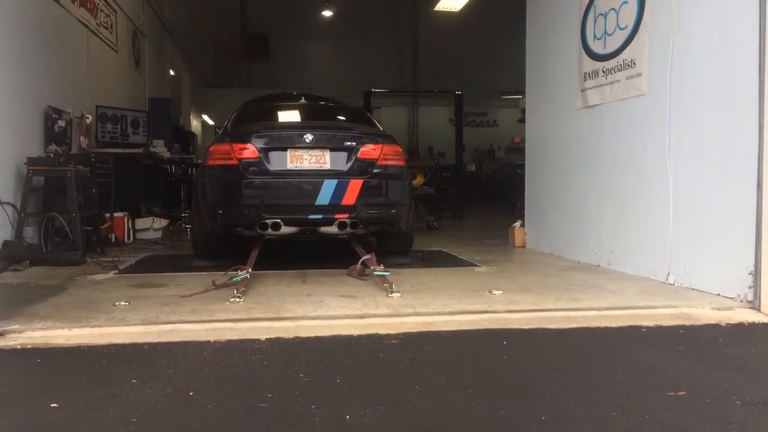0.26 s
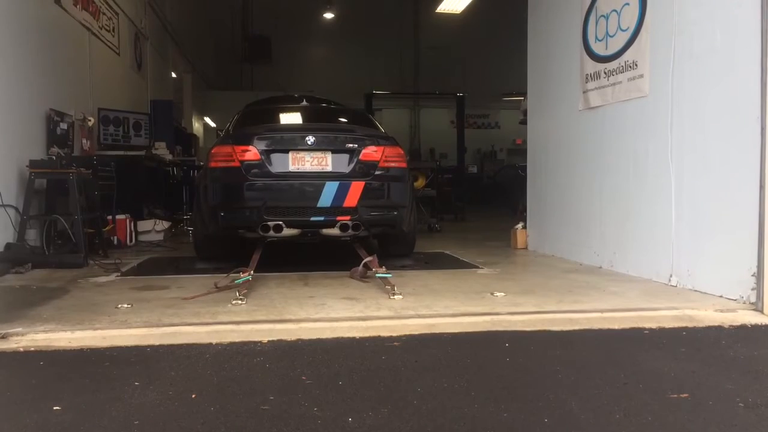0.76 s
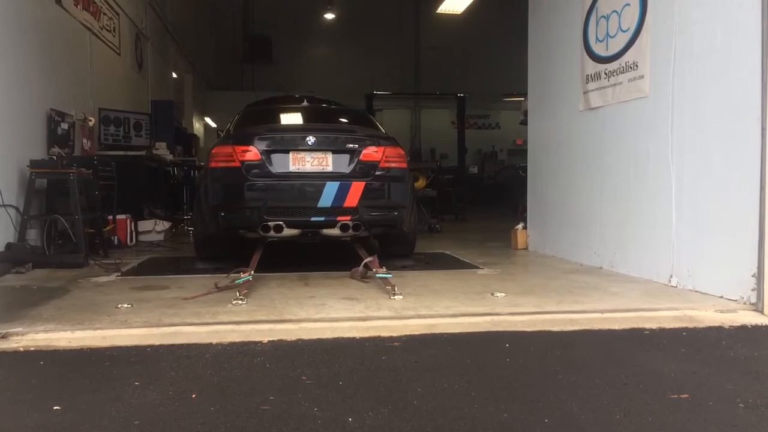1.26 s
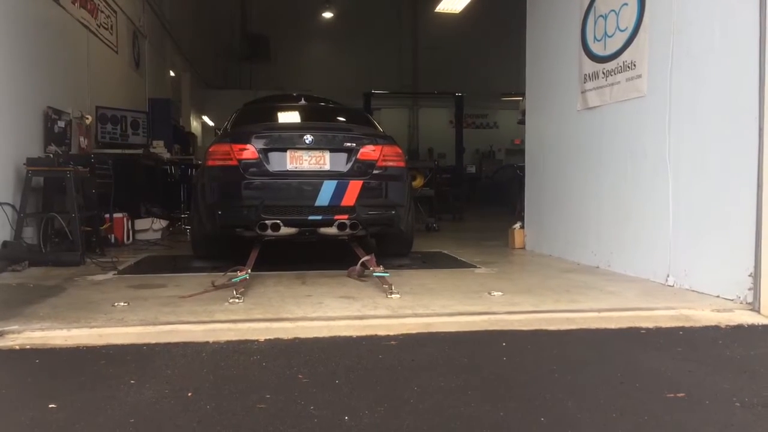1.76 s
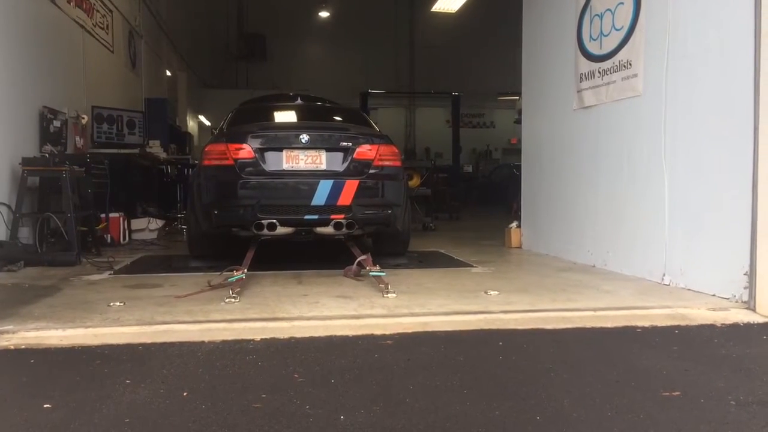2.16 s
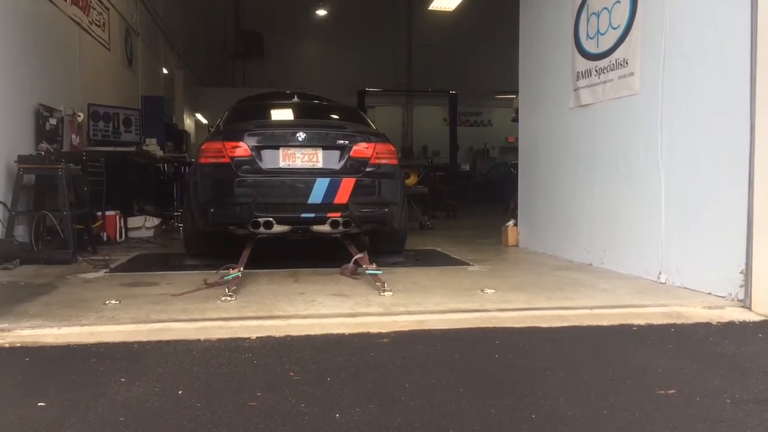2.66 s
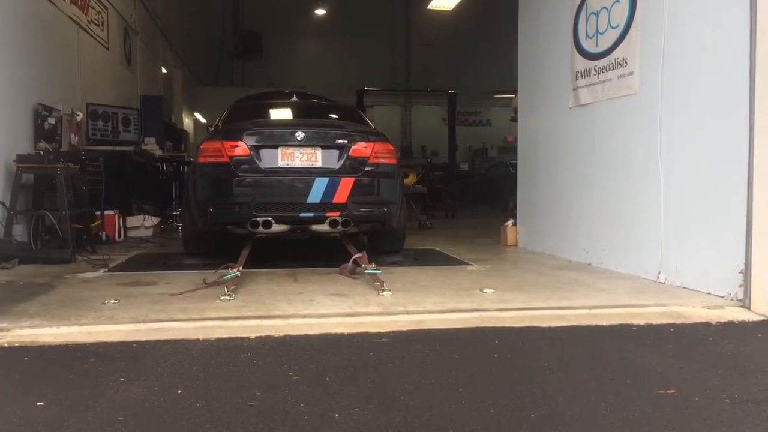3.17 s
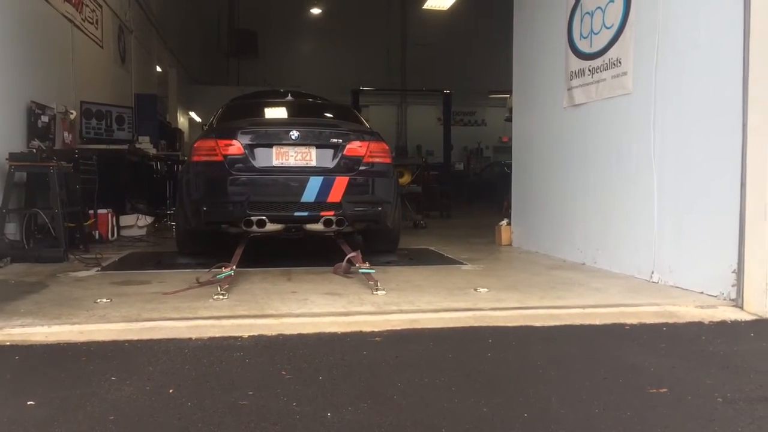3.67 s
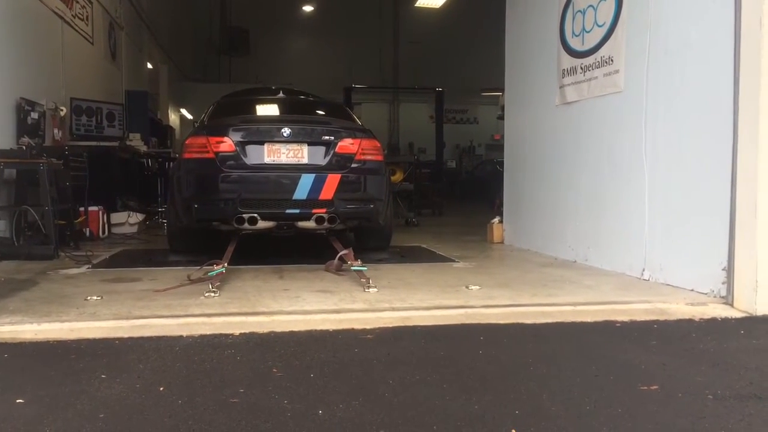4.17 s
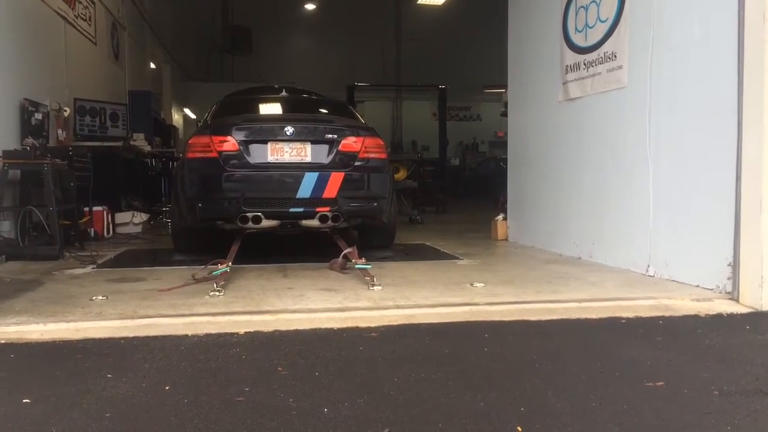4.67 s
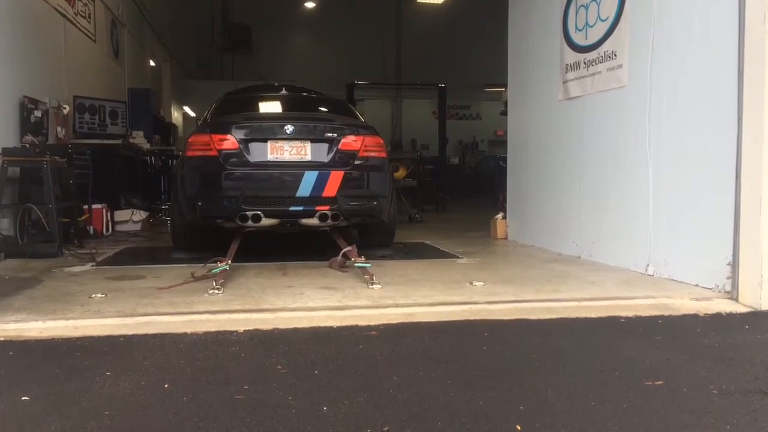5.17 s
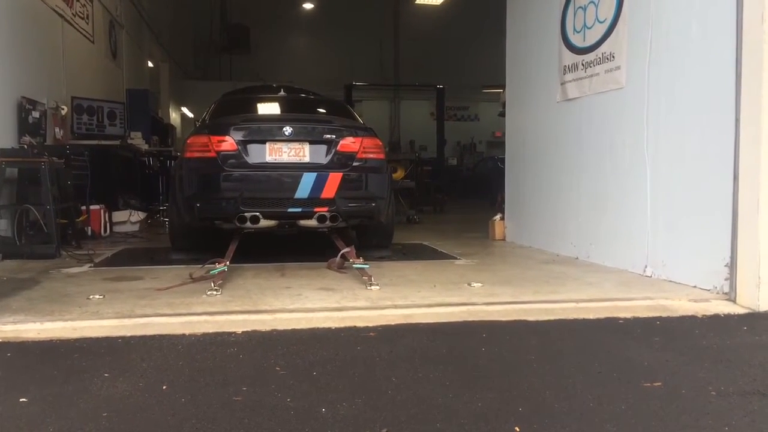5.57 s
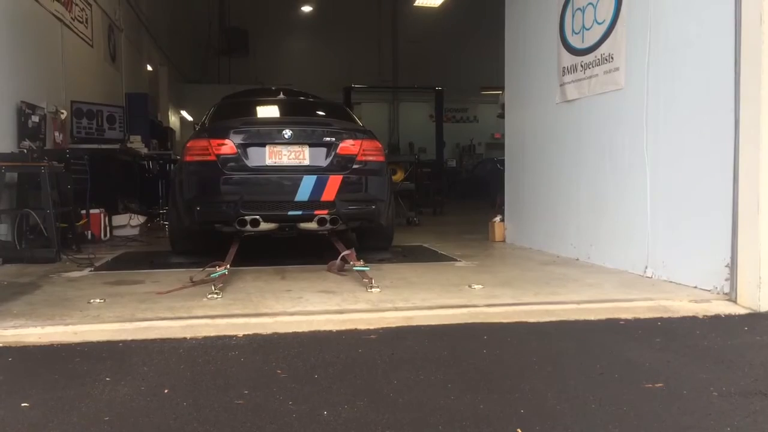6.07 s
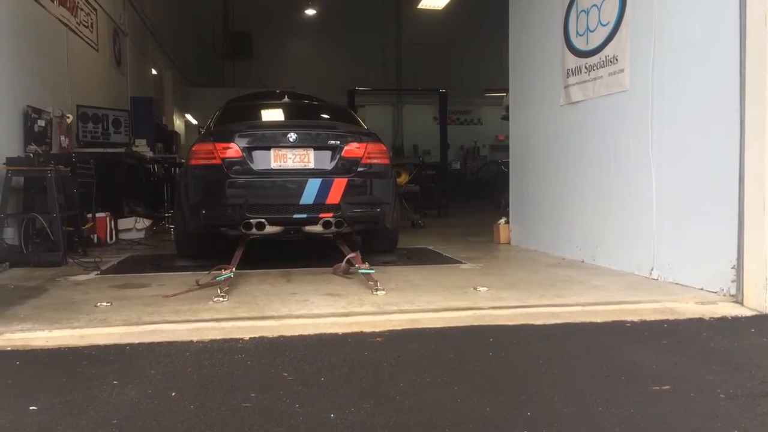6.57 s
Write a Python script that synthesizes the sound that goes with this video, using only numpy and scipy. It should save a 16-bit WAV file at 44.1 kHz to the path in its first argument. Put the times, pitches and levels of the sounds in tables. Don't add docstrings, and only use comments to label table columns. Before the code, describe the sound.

On a roller test bed, a sports car's low exhaust hum and high roller whine slide down together, then full throttle brings a raspy, rising roar.

```python
import sys
import numpy as np
from scipy import signal
from scipy.fft import rfft, irfft, next_fast_len
from scipy.io import wavfile
from scipy.ndimage import uniform_filter1d, minimum_filter1d, map_coordinates

SR = 44100
rng = np.random.default_rng(int(sys.argv[2]) if len(sys.argv) > 2 else 0)


def bounce(signal):
    frames = np.transpose(np.atleast_2d(signal))
    limited = np.clip(frames, -1, 1)
    pcm = np.round(limited * 32767).astype(np.int16)
    wavfile.write(sys.argv[1], SR, pcm)


def invert_db(level):
    return 10 ** (np.asarray(level, dtype=float) / 20)


N = 300762


def unit(x):
    return x / np.sqrt(np.mean(x ** 2) + 1e-20)


def along(points, hz):
    f, v = np.transpose(points)
    return np.interp(np.log(hz + 1), np.log(f + 1), v)


def curves(rows):
    s, *cols = np.transpose(rows)
    return [np.interp(np.arange(N) / SR, s, c) for c in cols]


def wobble(rate_hz):
    coarse = np.arange(0, N + 32, 32)
    knots = rng.standard_normal(int(N * rate_hz / SR) + 4)
    return np.interp(np.arange(N), coarse, map_coordinates(knots, [coarse * rate_hz / SR]))


def filtered(x, response):
    m = next_fast_len(N + SR // 2)
    return irfft(rfft(x, m) * response(np.fft.rfftfreq(m, 1 / SR)), m)[:N]


def causal(x, spectrum):
    size = 8192
    cepstrum = irfft(np.log(invert_db(along(spectrum, np.fft.rfftfreq(size, 1 / SR)))))
    cepstrum[1:size // 2] *= 2
    cepstrum[size // 2 + 1:] = 0
    return signal.fftconvolve(x, irfft(np.exp(rfft(cepstrum))))[:N]


def resonant(x, modes, low_hz):
    def response(f):
        peaks = sum(invert_db(db) * 1j * f * w / (c * c - f * f + 1j * f * w) for c, w, db in modes)
        return peaks * (1j * f / (low_hz + 1j * f)) ** 2
    return filtered(x, response)


def soften(f):
    return 1 / (1 + 1j * f / 900) ** 2


def levelled(x, seconds):
    return x / np.sqrt(np.abs(uniform_filter1d(x ** 2, int(seconds * SR))) + 1e-12)


def rush(spectrum, patchy_db):
    z = signal.stft(rng.standard_normal(N), nperseg=512)[2]
    field = uniform_filter1d(uniform_filter1d(rng.standard_normal(z.shape), 6, 0), 10, 1)
    x = signal.istft(z * invert_db(patchy_db * unit(field)), nperseg=512)[1][:N]
    return unit(filtered(x, lambda hz: invert_db(along(spectrum, hz))))


def tone(turns, db):
    return np.sqrt(2) * invert_db(db) * np.sin(2 * np.pi * turns)


def by_load(throttle, shut_db, open_db, power):
    return shut_db + (open_db - shut_db) * np.clip(throttle, 0, 1) ** power


# time in s, firing rate in Hz, firing tone in dB.
ENGINE = [(0, 158.6, -19), (.28, 154.3, -18), (.38, 154.2, -26), (.5, 153.2, -15.5), (2.5, 135.2, -15.5),
          (4.72, 116.5, -17), (4.82, 115.1, -27), (5.03, 114.2, -23.5), (5.1, 115.5, -13.5),
          (5.24, 122.1, -7), (5.33, 123.7, -11), (5.43, 126.8, -9.5), (5.49, 124.9, -13.5),
          (5.56, 128.8, -5.5), (5.66, 124.4, -11.5), (5.76, 131.9, -9), (5.97, 137.5, -9),
          (6.82, 164.6, -8)]
# time in s, opening 0-1.
THROTTLE = [
    (0, 0.61),
    (.28, 0.61),
    (.37, 0),
    (4.9, 0.02),
    (5.1, 0.32),
    (5.25, 0.96),
    (6.82, 0.98),
]


def engine():
    firing_hz, firing_db = curves(ENGINE)
    throttle, = curves(THROTTLE)
    cycle = np.cumsum(firing_hz / 8) / SR
    drone = silencer_drone(firing_hz, firing_db, throttle, cycle)
    blows, gas = exhaust_flow(firing_hz, throttle, cycle)
    bark = pipe_bark(firing_hz, throttle, cycle, blows, gas)
    return drone, bark + tailpipe_rasp(firing_hz, throttle, cycle, blows, gas)


# firing rate in Hz, level in dB.
BANK_SHUT = [(115, -22), (123, -19.8), (135, -20), (140, -21.5), (147, -22.5), (151, -20), (154, -17)]
# octave in Hz, level in dB.
OCTAVE = [(230, -60), (280, -48.5), (300, -43), (314, -36), (335, -62)]
# octave in Hz, level in dB.
OCTAVE_LOAD = [(225, -26), (250, -31.5), (275, -45.5)]
# multiple of the cycle, shut-throttle dB, open-throttle dB.
PATTERN = [(4, -42, -40), (5, -41.5, -40), (7, -47.5, -31), (9, -83, -43), (10, -38, -31.5),
           (11, -51.5, -38.5), (12, -38.5, -37.5), (13, -36.5, -37.5), (14, -29.5, -40.5)]
# frequency in Hz, gain in dB.
SILENCER = [(60, 3.5), (148, 7.5), (165, -3), (185, 5.5), (208, -1.5), (235, -19), (280, -33)]


def silencer_drone(firing_hz, firing_db, throttle, cycle):
    bank_db = by_load(throttle, along(BANK_SHUT, firing_hz), -30.5, 0.56) + 1.1 * wobble(5)
    firing_db = firing_db + 0.53 * wobble(6)
    drone = tone(8 * cycle + .25 + .008 * wobble(30), firing_db + .4 * wobble(25))
    drone += tone(6 * cycle + .35 + .015 * wobble(15), bank_db + wobble(12))
    drone += tone(16 * cycle + .02 * wobble(10), along(OCTAVE, 2 * firing_hz) + 1.5 * wobble(7))
    drone += throttle * tone(16 * cycle + .02 * wobble(10), along(OCTAVE_LOAD, 2 * firing_hz))
    for k, shut_db, open_db in PATTERN:
        shut_db = shut_db + along(SILENCER, k * firing_hz / 8) + np.minimum(firing_db + 19, 0)
        open_db = open_db + firing_db + 7
        level_db = shut_db + (open_db - shut_db) * throttle + 2 * wobble(4.6)
        drone += tone(k * cycle + 0.041 * wobble(8) + rng.random(), level_db)
    return drone


# relative blow, extra manifold travel in ms.
CYLINDERS = [(0.87, -0.026), (1, 0.23), (0.94, 0.34), (0.35, 0.43), (1, -0.17), (1, 0.13), (0.7, 0.069),
             (0.69, 0.69)]


def exhaust_flow(firing_hz, throttle, cycle):
    lead = np.interp(firing_hz, [128, 152, 162], [.28, .07, -.1])
    firing = 8 * cycle - lead
    at = np.flatnonzero(np.diff(np.floor(firing)) > 0)
    chance = rng.standard_normal((1200, 2))[:len(at)]
    blow, travel_ms = np.resize(CYLINDERS, (len(at), 2)).T
    load = .8 * throttle[at] ** 5 * np.clip((firing_hz[at] - 115) / 45, .2, 1)
    late = np.round((load * travel_ms + .07 * chance[:, 0]) * SR / 1000).astype(int)
    size = blow * invert_db(1.8 * chance[:, 1])
    blows = -np.bincount(np.clip(at + late, 0, N - 1), size, N)
    gas = rng.standard_normal(N) * np.exp(-2.5 * (firing % 1))
    return blows, gas


# firing rate in Hz, level in dB.
BARK_SHUT = [(115, -35), (138, -37), (148, -34.5), (154, -33.5)]
BARK_OPEN = [(120, -21), (127, -19), (135, -22), (153, -22.5), (161, -18)]
# frequency in Hz, width in Hz, level in dB.
GAS_FAST = [(291, 67, -16), (401.5, 39, -3), (444, 60, -3), (557.4, 13, 1.5), (603, 45, 6), (920, 260, -12)]
GAS_SLOW = [(296, 13, 6.5), (394, 62, 1.5), (483, 40, -2), (560, 16, -6.5), (727, 85, -15)]
# frequency in Hz, gain in dB.
PIPE = [(150, -20), (252, -4), (290, -11), (325, -13), (378, -5), (425, -13), (492, -3), (560, -4),
        (630, 1), (700, -14), (800, -11), (900, -18), (1300, -29), (9000, -75)]
# frequency in Hz, width in Hz, level in dB.
UPPER_PIPE = [(810, 70, 0), (970, 90, -10), (1150, 200, -18), (1400, 200, -19)]
# frequency in Hz, width in Hz, level in dB.
ROAR = [(615, 45, 0), (830, 60, -6)]
BANK_ORDERS = [30, 34, 36, 38]
# frequency in Hz, dB over the bark.
MAIN_MODE = [(540, -28), (585, -9), (612, -5), (635, -9), (690, -28)]


def pipe_bark(firing_hz, throttle, cycle, blows, gas):
    bark_db = by_load(throttle, along(BARK_SHUT, firing_hz), along(BARK_OPEN, firing_hz), 2.16)
    bark_db = bark_db + 0.37 * throttle * wobble(12)
    revs = np.clip((firing_hz - 124) / 20, 0, 1)
    sung = revs * unit(resonant(gas, GAS_FAST, low_hz=197))
    sung += (1 - revs) * unit(resonant(gas, GAS_SLOW, low_hz=194))
    steep = throttle ** 8 * np.clip((firing_hz - 122) / 30, 0, 1)
    struck = unit(causal(blows, PIPE))
    struck += invert_db(-3.0) * steep * unit(resonant(filtered(blows, soften), UPPER_PIPE, low_hz=516))
    roar = resonant(resonant(gas, ROAR, low_hz=296), [(600, 500, 0)], low_hz=296)
    struck += invert_db(-14) * steep * unit(roar)
    gas_share = .95 - .91 * throttle
    mix = np.sqrt(1 - gas_share) * levelled(struck, 0.43)
    mix += np.sqrt(gas_share) * levelled(filtered(sung, soften), 0.2)
    bark = invert_db(bark_db + .5 * throttle) * mix
    for k in BANK_ORDERS:
        bark += steep * tone(k * cycle + .03 * wobble(12), bark_db + along(MAIN_MODE, k * firing_hz / 8))
    return bark


# firing rate in Hz, level in dB.
RASP_SHUT = [(115, -45), (125, -41), (140, -37), (155, -36)]
RASP_OPEN = [(122, -57), (135, -71), (150, -40), (164, -41)]
# frequency in Hz, width in Hz, level in dB.
TIPS = [(958, 9.5, 13), (937, 19, -1.5), (1285, 45, 3.5), (1483, 22, 6), (1700, 46, -19), (2000, 370, -6)]


def tailpipe_rasp(firing_hz, throttle, cycle, blows, gas):
    rasp_db = by_load(throttle, along(RASP_SHUT, firing_hz), along(RASP_OPEN, firing_hz), 2.16)
    rasp_db = rasp_db + (0.86 + 1.2 * throttle) * wobble(10)
    cracks = levelled(blows * invert_db(1.6 * wobble(150) + 3 * np.cos(4 * np.pi * cycle)), .3)
    flow = filtered(throttle * cracks + unit(gas), soften)
    return invert_db(rasp_db - 8.5) * levelled(resonant(flow, TIPS, low_hz=875), 0.12)


def recorder_duck_db():
    start_s, takes_s = 5.19, 0.11
    firing_db = curves(ENGINE)[1]
    ducked = np.clip((np.arange(N) / SR - start_s) / takes_s, 0, 1)
    return (-8 - 0.36 * (firing_db + 10)) * ducked


# time in s, groove rate in Hz.
ROLLERS = [
    (0, 2398),
    (.3, 2427),
    (.6, 2362),
    (2.1, 2163),
    (4.75, 1777),
    (5.1, 1786),
    (5.3, 1830),
    (5.7, 1985),
    (6.3, 2245),
    (6.82, 2508),
]
# groove rate in Hz, level in dB.
HISS_SPEED = [(1780, -49.5), (2100, -47.5), (2300, -46), (2400, -42.5), (2520, -43.5)]
# frequency in Hz, dB per Hz.
HISS = [(530, -50), (900, 0), (1130, -7.5), (1430, -6.5), (1550, -2), (2400, -8), (3710, -5), (6320, -8),
        (7450, -7.5), (11300, -11), (15100, -18)]


def rollers():
    groove_hz, = curves(ROLLERS)
    throttle, = curves(THROTTLE)
    turns = np.cumsum(groove_hz) / SR
    duck_db = recorder_duck_db()
    grip_db = 4 * np.exp(-((np.arange(N) / SR - 5.09) / .12) ** 2)
    hiss_db = along(HISS_SPEED, groove_hz) + duck_db + grip_db
    whine = roller_whine(groove_hz, turns, throttle, duck_db, hiss_db)
    hum = invert_db(hiss_db + 5.5 - 1.1 * throttle ** 8) * tyre_hum(turns)
    hiss = invert_db(hiss_db + 11) * rush(HISS, patchy_db=0.3)
    surge = invert_db(0.24 * wobble(25) + (.5 + 1.06 * throttle ** 6) * wobble(60))
    return tyre_beat(groove_hz, turns, duck_db) + surge * (whine + hum + hiss)


# level in dB, then change under load in dB.
WHINE_DB = [-43, -36.5, -45.5]
WHINE_LOAD_DB = [-6, -6.5, -3]
# frequency in Hz, gain in dB.
WALL_LUMPS = [(3560, -2.5), (3720, 1), (3900, -2.5), (4020, 2.5), (4250, 1), (4400, 2.5), (4555, -5),
              (4630, 2)]


def roller_whine(groove_hz, turns, throttle, duck_db, hiss_db):
    levels_db = []
    for db, load_db in zip(WHINE_DB, WHINE_LOAD_DB):
        wander_db = 1.3 * wobble(4.013) + 4 * throttle ** 8 * wobble(14)
        levels_db.append(db + duck_db + load_db * throttle + wander_db)
    first_db, second_db, fourth_db = levels_db
    second_db = second_db + along(WALL_LUMPS, 2 * groove_hz)
    row = [(1, first_db), (2, second_db), (3, fourth_db - 9.5), (4, fourth_db),
           (5, hiss_db - 12 + 3 * throttle), (6, hiss_db - 21)]
    whine = 0
    for k, db in row:
        whine = whine + (.9 + .45 * wobble(60)) * tone(k * turns, db)
        whine = whine + .45 * wobble(60) * tone(k * turns + 1 / 4, db)
    return whine


# multiple of groove rate, width in Hz, level in dB.
TREAD = [(1.735, 114, -5), (2.19, 39, -8.5), (1.9, 1700, 1), (4.4, 150, -20)]


def tyre_hum(turns):
    hum = 0
    for k, width_hz, db in TREAD:
        flutter = unit(filtered(rng.standard_normal(N), lambda f: np.exp(-(f / width_hz) ** 2)))
        hum = hum + flutter * tone(k * turns, db)
    return hum


def tyre_beat(groove_hz, turns, duck_db):
    swell = np.cos(np.pi * (turns / 273 - .2)) ** 2
    beat_db = -33 + .03 * (groove_hz - groove_hz[0]) + duck_db + 0.5 * wobble(6.7)
    return swell * tone(.1583 * turns + .03 * wobble(15), beat_db)


# frequency in Hz, dB per Hz.
RUMBLE = [(10, -19), (22, -15), (45, -2.5), (80, -4.5), (130, -3.5), (200, -12), (260, -18.5), (500, -18.5),
          (1000, -32.5), (1500, -80)]


def shop_rumble():
    throttle, = curves(THROTTLE)
    return invert_db(-31.0 + 2 * throttle + 0.82 * wobble(3.085)) * rush(RUMBLE, patchy_db=1.5)


# frequency in Hz, t60 in s.
SHOP = [(100, 0.19), (1000, 1), (8000, 0.58)]


def shop(x):
    hz, t, z = signal.stft(rng.standard_normal(SR // 2), SR, nperseg=256)
    tail = signal.istft(z * invert_db(-60 * t / along(SHOP, hz)[:, None]), SR, nperseg=256)[1]
    return signal.fftconvolve(np.pad(x, (500, 0)), tail / np.linalg.norm(tail))[:N]


def scene():
    drone, pipes = engine()
    return (drone + pipes + invert_db(-9.5) * shop(pipes) + rollers() + shop_rumble())[None]


def roll_off(x):
    return signal.sosfilt(signal.butter(12, 15290, fs=SR, output="sos"), x)


def record(dry):
    need = np.minimum(1, .7 / (np.abs(dry) + 1e-9))
    hold = int(.008 * SR)
    gain = uniform_filter1d(minimum_filter1d(need, 2 * hold, axis=1), hold, axis=1)
    return roll_off(dry * gain)


dry = scene()
out = record(dry)
bounce(out)
```